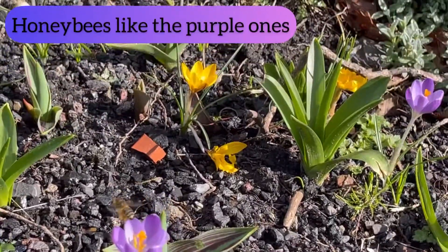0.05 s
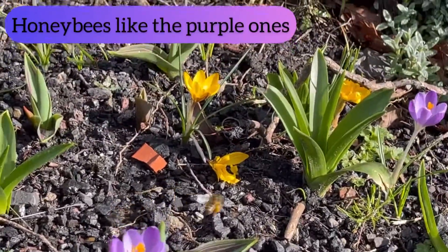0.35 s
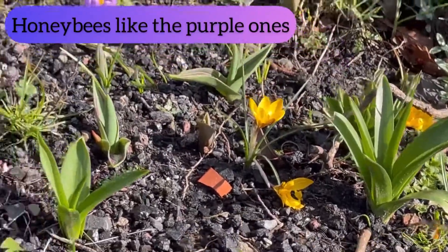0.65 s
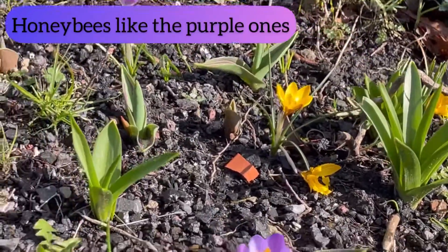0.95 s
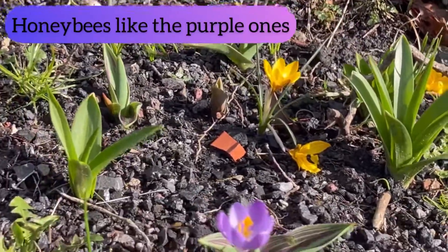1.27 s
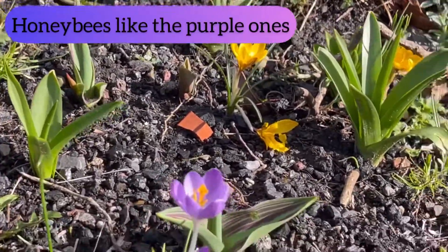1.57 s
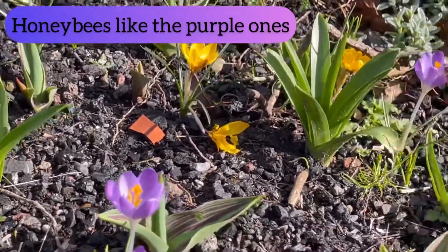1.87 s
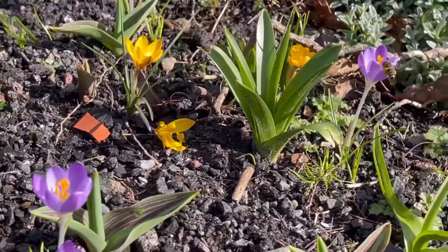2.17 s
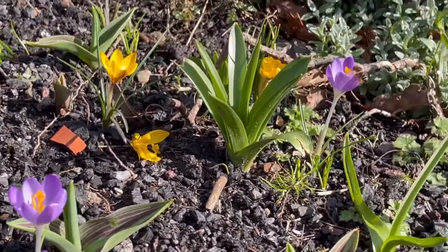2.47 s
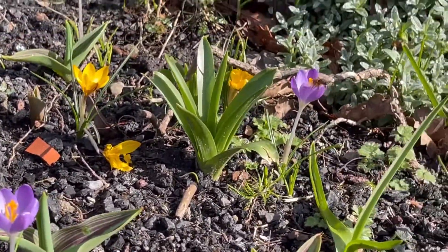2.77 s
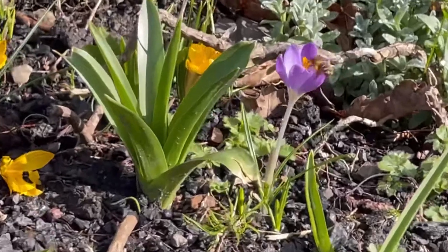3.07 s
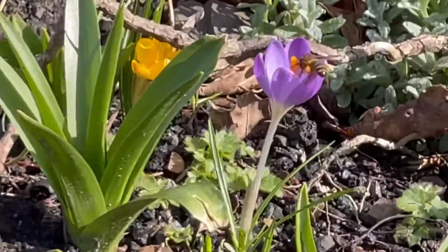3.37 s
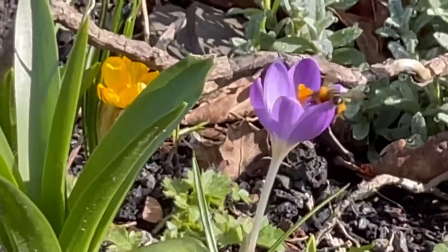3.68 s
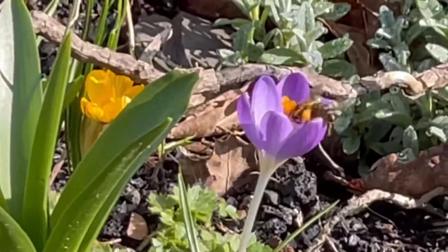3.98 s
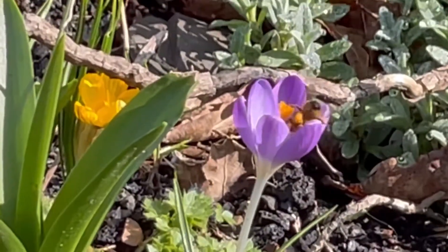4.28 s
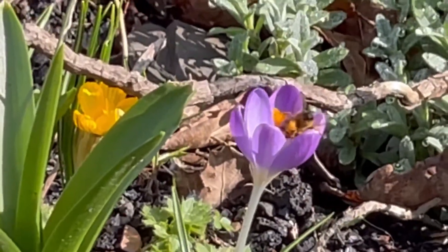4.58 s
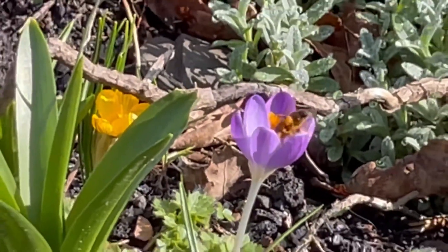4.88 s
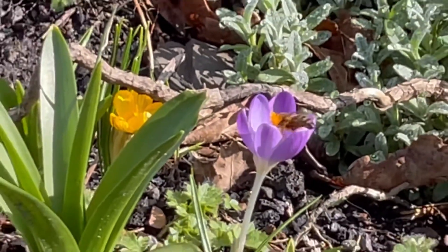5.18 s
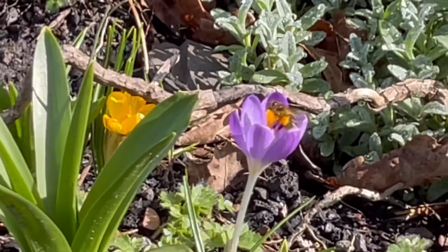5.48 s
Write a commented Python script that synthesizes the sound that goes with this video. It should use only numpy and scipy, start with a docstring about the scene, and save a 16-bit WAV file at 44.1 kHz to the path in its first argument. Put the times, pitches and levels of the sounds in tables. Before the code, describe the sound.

A hand scuffs and bumps the microphone, then high birdsong comes through a low outdoor rumble and a fading, far-off engine. One bird sings fast slurs and twitters, and another keeps up a faint see-saw call, both slightly blurred by the garden around them. Cloth rustles close by now and then, most crisply near the middle, where a few soft knocks follow. The singing grows sparser and softer later.

```python
"""Spring garden birdsong

A songbird warbles thin gliding notes while a farther bird repeats a see-saw call at an even pace,
both blurred by shrubs and walls. A distant engine hums and fades into the rumble of the town.
Close by, cloth rustles past the microphones and a hand scuffs and bumps the camera it holds."""
import sys
import numpy as np
from scipy import signal
from scipy.fft import rfft, irfft
from scipy.io import wavfile
from scipy.ndimage import uniform_filter1d

SR = 44100
rng = np.random.default_rng(int(sys.argv[2]) if len(sys.argv) > 2 else 0)


def wav_out(sig):
    """Save sig, one row per channel (or a flat mono array), as 16-bit PCM at SR to the path in sys.argv[1]."""
    wavfile.write(sys.argv[1], SR, np.round(np.clip(np.atleast_2d(sig).T, -1, 1) * 32767).astype(np.int16))


N = 248724
TIME = np.arange(N) / SR
HZ = np.fft.rfftfreq(N, 1 / SR)


def amp(db):
    """Decibels to gain."""
    return 10 ** (np.asarray(db) / 20)


def unit(x):
    """Scales to rms 1."""
    return x / np.sqrt(np.mean(x ** 2) + 1e-20)


def read(points, hz):
    """Reads a curve on a log-frequency axis."""
    f, value = np.transpose(points)
    return np.interp(np.log(hz + 1), np.log(f), value)


def curves(table):
    """Each column of a time table as a sample-by-sample envelope."""
    s, *columns = np.transpose(table)
    return [np.interp(TIME, s, column) for column in columns]


def add(mix, s, sound):
    """Mixes a sound in at time s."""
    part = mix[max(round(s * SR), 0):][:len(sound)]
    part += sound[:len(part)]


def wander(rate_hz):
    """Smooth random drift of rms 1."""
    return unit(irfft(rfft(rng.standard_normal(N)) * np.exp(-(HZ / rate_hz) ** 2), N))


def swell(middle_s, half_s):
    """A smooth rise and fall around one moment."""
    return np.exp(-((TIME - middle_s) / half_s) ** 2)


def garden(x, wet_db, t60, near_db, near_t60, spread):
    """Near shrubs blur a sound at once; farther walls add a thin tail of echoes."""
    t = TIME[:SR]
    taps = rng.standard_normal((2, SR)) * (rng.random((2, SR)) < 2000 / SR) * (t > .003)
    decay = amp(near_db) * unit(amp(-60 * t / near_t60)) + amp(wet_db) * unit(amp(-60 * t / t60))
    mid, side = signal.fftconvolve(x[None], unit(taps) * decay / np.sqrt(SR), axes=1)[:, :N]
    return x + np.array([mid + spread * side, mid - spread * side])


# Stereo image of the ambience. Each row: frequency in Hz, left-right correlation.
CORRELATION = [(50, 1), (150, 0.87), (300, 0.37), (600, 0.14), (1100, -0.24), (2000, 0.42), (4000, 1),
               (12000, 1)]

def wash(spectrum, band_hz):
    """Diffuse stereo noise whose mid signal has rms 1 inside the band."""
    mid, side = rfft(rng.standard_normal((2, N))) * amp(read(spectrum, HZ))
    same = np.clip(read(CORRELATION, HZ), -1, 1)
    side *= np.sqrt((1 - same) / (1 + same + 1e-3))
    inside = irfft(mid * (HZ > band_hz[0]) * (HZ < band_hz[1]), N)
    return irfft(np.array([mid + side, mid - side]), N) / inside.std()


# Tone of the three ambience beds. Each row: frequency in Hz, gain in dB.
RUMBLE_EQ = [(20, -37), (35, -24), (55, 4.5), (80, 7), (130, 1.5), (165, -4), (200, -1), (265, -0.5),
             (320, -11.5), (400, -17.5), (500, -12.5), (900, -38), (2000, -76)]
ROAD_EQ = [(200, -21), (500, -6), (800, -1), (1100, 6), (1400, 0), (1800, -8), (2400, -14.5), (3000, -38),
           (6000, -33.5), (12000, -34.5)]
AIR_EQ = [(300, -18), (700, 5), (1500, 0), (1800, -0.5), (2300, 3.5), (3000, -5), (4200, -10),
          (6000, -16.5), (9000, -20), (10500, -16), (11300, -18), (12500, -38)]
# Fader moves on the beds. Each row: time in seconds, rumble in dB, air in dB.
BED_FADERS = [(0, -49, -59.5), (.35, -49, -64), (1.0, -49, -63), (1.5, -52.5, -67.5), (2.6, -54, -73),
              (3.2, -56.5, -75.5), (3.8, -57.5, -78.5), (5.25, -59, -81.5), (5.5, -58.5, -76.5)]

def surroundings(road_db=-64.3, road_fall_db_per_s=0.3):
    """Town rumble, a far road and a thin hiss of air, all slowly easing."""
    rumble_db, air_db = curves(BED_FADERS)
    rumble = amp(rumble_db + 0.69 * wander(3)) * wash(RUMBLE_EQ, band_hz=(160, 400))
    road = amp(road_db - road_fall_db_per_s * TIME + 0.88 * wander(4)) * wash(ROAD_EQ, (850, 1600))
    air = amp(air_db + 0.68 * wander(13)) * wash(AIR_EQ, band_hz=(1900, 2800))
    return rumble * amp([[.5], [-.5]]) + (road + air) * amp([[-.8], [.8]])  # slightly left, right


# The drone's noise bands. Each row: multiple of the pitch, gain in dB.
DRONE_PARTIALS = [(1, 0.5), (1.2, -8.5)]

def drone(start_hz=302.8, rest_hz=227.3, settle_s=2.85, fall_db_per_s=2.5, width_hz=30, spread=0.51):
    """Two narrow bands of distant engine noise slide down and fade as their source moves away."""
    hz = rest_hz + (start_hz - rest_hz) * np.exp(-TIME / settle_s)
    angle = 2 * np.pi * np.cumsum(hz) / SR

    def band(multiple):
        noise = wander(width_hz) + 1j * wander(width_hz)
        return unit((noise * np.exp(1j * multiple * angle)).real)

    mid, side = (sum(amp(db) * band(k) for k, db in DRONE_PARTIALS) for _ in range(2))
    return amp(-49.5 - fall_db_per_s * TIME) * np.array([mid + spread * side, mid - spread * side])


# Swells of the engine's second harmonic. Each row: middle in seconds, half length in seconds, level in dB.
HUM_SWELLS = [(3.837, 0.17, -46.5), (4.36, 0.13, -50), (4.952, 0.056, -52)]

def engine_second_harmonic(pitch_hz=95.3):
    """A clean low tone at the engine's second harmonic that comes and goes on its own."""
    level = sum(amp(db) * swell(s, half_s) for s, half_s, db in HUM_SWELLS) * amp(wander(10))
    hz = pitch_hz * (1 + 0.017 * wander(9.1))
    return np.sqrt(2) * level * np.sin(2 * np.pi * np.cumsum(hz) / SR)


# The engine's course. Each row: time in seconds, pitch in Hz, relative level in dB.
ENGINE_COURSE = [(0, 48.3, -35.5), (.75, 47.7, -39.5), (1.05, 47.67, -34.5), (1.6, 47.57, -39),
                 (2.0, 47.6, -47.5), (2.4, 47.36, -58.5), (3.85, 45.74, -52.5), (4.7, 45.3, -52.5),
                 (5.64, 47.1, -73)]
# Its harmonics. Each row: multiple of the pitch, gain in dB.
ENGINE_HARMONICS = [(1, 1.5), (2, -13), (3, -20)]

def engine(throb_db=2.0, throb_hz=15):
    """A distant engine: a deep, unevenly throbbing hum with weak overtones."""
    hz, db = curves(ENGINE_COURSE)
    cycles = np.cumsum(hz * (1 + 0.019 * wander(15))) / SR
    hum = np.zeros(N)
    for multiple, gain_db in ENGINE_HARMONICS:
        throb = amp(gain_db + throb_db * wander(throb_hz))
        hum += throb * np.sin(2 * np.pi * (multiple * cycles + rng.random()))
    return amp(db + 0.5) * hum


# Grip scuffs. Each row: middle and half length in seconds, centre and width in Hz, level in dB.
GRIP_SCUFFS = [(.01, 0.027, 77.8, 22, -27), (0.097, 0.14, 122, 35, -41.5), (0.11, 0.094, 346, 69.6, -52.5),
               (4.299, 0.028, 139, 35, -55), (5.415, 0.078, 403, 149.6, -57.5),
               (5.43, 0.043, 5820, 450, -75)]

def scuffs():
    """The hand shifts its grip: short swells of soft noise."""
    out = np.zeros(N)
    for s, half_s, hz, width_hz, db in GRIP_SCUFFS:
        band = np.exp(-((HZ - hz) / width_hz) ** 2 / 2)
        out += amp(db) * swell(s, half_s) * unit(irfft(rfft(rng.standard_normal(N)) * band, N))
    return out


# Finger knocks. Each row: start in seconds, pitch in Hz, level in dB, attack in seconds.
KNOCKS = [(0.104, 62, -20, 0.017), (0.17, 69.4, -33, 0.009), (2.364, 70, -37.5, 0.013),
          (2.66, 720, -47.5, 0.0023), (2.674, 600, -36.5, 0.0039), (2.682, 97.4, -40, 0.011),
          (3.078, 55, -36.5, 0.02), (5.425, 101, -45, 0.0071)]

def bumps():
    """Soft knocks of the hand ring the camera body for a few cycles."""
    out, t = np.zeros(N), TIME[:SR // 4]
    for s, hz, db, attack_s in KNOCKS:
        envelope = (t / attack_s * np.exp(1 - t / attack_s)) ** 2
        add(out, s, amp(db) * envelope * np.sin(2 * np.pi * hz * t))
    return out


# Tone of the cloth, for rubs and snags. Each row: frequency in Hz, gain in dB.
CLOTH_EQ = [(800, -15), (2000, -9), (3300, -2), (4400, -0.5), (4800, -5), (6000, -5), (6900, 2),
            (7700, -4.5), (9100, -1.5), (10500, 2.5), (11300, -4), (12000, -26), (13000, -33)]
# Cloth rubs. Each row: start and end in seconds, relative level in dB, brightness, swell in dB.
RUBS = [(0.721, 1.03, -70, -4, -9), (1.034, 1.186, -67, 6, -12), (1.21, 1.585, -65, -6, -1.5),
        (2.281, 2.393, -61.5, 7, -2), (2.431, 2.535, -55, 9.5, 3), (2.903, 2.998, -62.5, 8, 4),
        (3.19, 3.331, -61, 13.5, 13), (4.466, 4.513, -79, -11, 0), (5.478, 5.519, -61.5, 11, -7)]

def rustles(snaps_per_s=70, snap_db=18.5, fold_db=4, fade_s=0.02, pivot_hz=8000):
    """Cloth slides with uneven drag: fibres slip in clumps or snap, each fold with its own colour."""
    hiss = rng.standard_normal(N)
    grain_db = 2.5 * np.minimum(rng.exponential(1, N), 4)
    clump_db, drag_db = 3.5 * wander(190), 3 * wander(23)
    slips = unit(hiss * amp(grain_db + clump_db + drag_db))
    snaps = rng.standard_normal(N) * (rng.random(N) < snaps_per_s / SR)
    frames = signal.stft(slips + amp(snap_db) * snaps, nperseg=256)[2]
    folds = uniform_filter1d(rng.standard_normal(frames.shape), size=3, axis=0)
    folds = unit(uniform_filter1d(folds, size=8, axis=1))  # patches in frequency and time
    spectrum = rfft(signal.istft(frames * amp(fold_db * folds))[1][:N]) * amp(read(CLOTH_EQ, HZ))
    octaves = np.clip(np.log2((HZ + 1) / pivot_hz), -.6, .6)
    rub = np.zeros(N)
    for start, end, db, brightness, swell_db in RUBS:
        stroke = np.clip(np.minimum(TIME - start, end - TIME) / fade_s + .5, 0, 1)
        pressure = amp(db + swell_db * np.interp(TIME, [start, end], [-.5, .5]))
        fibres = irfft(spectrum * amp(0.67 * brightness * octaves), N)
        rub += pressure * stroke * fibres / fibres[stroke > 0].std()
    return amp(2.5) * garden(rub, wet_db=-18, t60=0.27, near_db=-8.5, near_t60=0.17, spread=0.14)


# Cloth snags. Each row: peak time in seconds, relative level in dB, centre in Hz, attack in seconds.
SNAGS = [(0.731, -54, 9600, .0025), (1.319, -54.5, 7000, 0.0073), (1.569, -58, 7000, .0029),
         (2.287, -48, 8200, 0.0065), (2.305, -46, 7460, 0.0046), (2.356, -50.5, 8500, .003),
         (2.43, -43, 9170, 0.0021), (2.445, -40, 9650, 0.0021), (2.502, -47.5, 8000, 0.0068),
         (3.308, -50, 8850, 0.0047)]

def snags(width_hz=2600):
    """Now and then the cloth snags and lets go with a short crisp burst."""
    out, t = np.zeros(N), TIME[:4096]
    hz = np.fft.rfftfreq(len(t), 1 / SR)
    for s, db, centre_hz, attack_s in SNAGS:
        colour = amp(read(CLOTH_EQ, hz)) * np.exp(-((hz - centre_hz) / width_hz) ** 2 / 2)
        burst = unit(irfft(rfft(rng.standard_normal(len(t))) * colour))
        envelope = (t / attack_s * np.exp(1 - t / attack_s)) ** 2
        add(out, s - attack_s, amp(db) * envelope * burst)
    return amp(-0.5) * out


def whistle(length_s, pitches_hz, levels_db, waver, flutter_db, edge_s):
    """One bird note: a sine on a smooth glide that trembles in pitch and strength."""
    along = np.linspace(0, 1, max(int(length_s * SR), 64))
    contour = np.polyfit(np.linspace(0, 1, len(pitches_hz)), pitches_hz, len(pitches_hz) - 1)
    tremble, flutter = (unit(uniform_filter1d(rng.standard_normal(SR // 4), size=n))[:len(along)]
                        for n in (120, 300))
    hz = np.polyval(contour, along) * (1 + waver * tremble)
    db = np.interp(along, (np.arange(len(levels_db)) + .5) / len(levels_db), levels_db)
    gate = signal.windows.tukey(len(along), min(2 * edge_s / length_s, 1))
    return np.sqrt(2) * amp(db + flutter_db * flutter) * gate * np.sin(2 * np.pi * np.cumsum(hz) / SR)


def far_birds(count=90, low_hz=3300, high_hz=5000):
    """Faint falling slurs from other gardens, more echo than note."""
    voice = np.zeros(N)
    for k, (late, pitch, slope, length, soft) in enumerate(rng.random((count, 5))):
        fall = 1 + (slope + .35) * np.array([.13, -.02, -.1])
        pitches_hz = (low_hz + (high_hz - low_hz) * pitch) * fall
        note = whistle(.033 + .04 * length, pitches_hz, [-5 * soft],
                       waver=.014, flutter_db=3, edge_s=.007)
        add(voice, (k + late) / count * N / SR, note)
    return amp(-90.5) * garden(voice, wet_db=4.5, t60=0.52, near_db=6, near_t60=0.12, spread=0.27)


# Glides of the two see-saw notes. Each entry: pitch in Hz, evenly spaced along the note.
LOW_GLIDE = [3800, 4140, 4200, 4204]
HIGH_GLIDE = [6350, 6260, 6410, 6360]
# Their balance. Each row: time in seconds, relative levels of the low and the high note in dB.
CALL_FADERS = [(.5, -68, -69), (1.24, -64, -67), (1.6, -59.5, -76), (2.3, -64, -80), (3.39, -61, -94),
               (3.67, -68.5, -87), (4.15, -63.5, -72), (4.55, -64.5, -81), (5.3, -66, -81)]
# Runs of calls. Each row: start, end and repeat period, all in seconds.
CALL_RUNS = [(.48, .6, .267), (1.235, 2.7, .267), (2.83, 4.36, .279), (4.504, 5.45, .267)]

def seesaw_bird(high_after_s=.125):
    """A husky upslur that settles, then a faint high note, evenly repeated and blurred by distance."""
    voice = np.zeros(N)
    low_db, high_db = curves(CALL_FADERS)
    for s in np.concatenate([np.arange(*run) for run in CALL_RUNS]):
        now = round(s * SR)
        rising_db = low_db[now] + np.array([-6, -1, 0])
        low = whistle(.0792, LOW_GLIDE, rising_db, waver=.022, flutter_db=2.5, edge_s=.0053)
        high = whistle(.043, HIGH_GLIDE, [high_db[now]], waver=.0067, flutter_db=3, edge_s=.0069)
        add(voice, s, low)
        add(voice, s + high_after_s, high)
    return amp(-3.5) * garden(voice, wet_db=-7, t60=0.83, near_db=-4, near_t60=0.095, spread=.2)


# Bouts of soft twittering. Each row: start in seconds, end in seconds, level in dB.
TWITTER_BOUTS = [(1.73, 1.86, -67), (3.04, 3.27, -71), (3.385, 3.451, -66)]

def twitter(flicks_per_s=60, flick_s=.018, centre_hz=4420, scatter_hz=800, fall_hz=600):
    """The songbird fills its quickest phrases with tiny falling flicks at random pitches."""
    voice = np.zeros(N)
    for start, end, db in TWITTER_BOUTS:
        jitter = rng.uniform(-1, 1, (64, 2))
        for s, (late, pitch) in zip(np.arange(start, end, 1 / flicks_per_s), jitter):
            pitches_hz = centre_hz + scatter_hz * pitch + fall_hz * np.array([.5, -.5])
            flick = whistle(flick_s, pitches_hz, [db], waver=.014, flutter_db=2, edge_s=.0056)
            add(voice, s + .5 * late / flicks_per_s, flick)
    return garden(voice, wet_db=-10, t60=.5, near_db=-4.5, near_t60=0.072, spread=.3)


# The lead song. Each row: start and length in seconds, first pitch, last pitch and arch of the
# glide in Hz, relative level in dB, swell in dB per note length.
SONG_NOTES = [(0.421, 0.065, 5300, 4700, -180, -62.5, -10), (0.594, .041, 4810, 6030, -470, -61, 12),
              (0.657, 0.04, 5930, 4800, -100, -58.5, 7), (0.763, 0.058, 7200, 5800, -250, -60.5, 20),
              (1.062, 0.07, 5160, 3390, 300, -57.5, 1), (1.167, .064, 3270, 4020, 130, -64.5, 3),
              (1.424, 0.079, 4430, 4390, 322, -63, 5), (1.547, 0.12, 5400, 5120, 184, -59.5, -3),
              (1.695, 0.076, 3840, 4600, -240, -65.5, 13), (1.736, .028, 4430, 4200, 596, -58.5, 0),
              (1.773, 0.044, 4640, 4350, 455, -61.5, 4), (1.819, 0.05, 5000, 3130, -650, -61, -18),
              (1.921, .049, 3410, 2540, -100, -65.5, -2), (1.941, 0.037, 5980, 4700, -370, -56.5, 0),
              (1.978, 0.033, 4040, 5080, 82, -58, -2), (2.048, 0.026, 6880, 6400, -320, -58.5, -2),
              (2.088, 0.037, 8350, 6240, -190, -59.5, 20), (2.148, 0.043, 5330, 6310, 324, -57, 12),
              (2.234, 0.036, 5830, 4830, 190, -54.5, -1), (2.275, 0.021, 5980, 5940, 490, -51.5, 13),
              (2.455, 0.092, 3280, 3230, 1203, -57.5, -3), (2.628, 0.078, 5600, 5470, 134, -51, 8.5),
              (2.727, 0.051, 5460, 5160, -59, -54, -5), (2.914, 0.0265, 5070, 5730, 200, -51, 6),
              (2.939, .056, 5640, 4100, -58, -57.5, -15), (3.166, 0.027, 5200, 4500, -100, -62.5, 0),
              (3.197, 0.018, 3870, 3920, 40, -61.5, -2), (3.226, 0.031, 4830, 4270, 500, -61, 8),
              (3.255, 0.037, 3600, 4020, 60, -64, 0), (3.383, .05, 5360, 4240, 301, -66, 7),
              (3.421, 0.055, 4520, 3120, -310, -66, -9), (3.514, 0.074, 5480, 4700, -100, -77, -4),
              (3.958, 0.067, 5640, 4670, -210, -75, 8), (4.818, 0.056, 8310, 7860, -120, -69, 4),
              (4.849, 0.093, 7660, 7430, 169, -67.5, 3), (4.977, 0.068, 8050, 7480, 139, -69.5, 13),
              (5.015, 0.016, 4710, 5000, 147, -65, -10), (5.083, 0.067, 8030, 7020, 740, -74, 7),
              (5.156, .086, 8370, 7950, -170, -73.5, -5), (5.25, .085, 6900, 6420, 98, -80, 3)]

def songbird(full_voice_db=-60.5, max_waver_hz=50):
    """A quick warble of slurs, hooks and held notes: arched glides, huskier and more blurred if soft."""
    direct, blurred = np.zeros((2, N))
    for start, length, first_hz, last_hz, arch_hz, db, swell_slope in SONG_NOTES:
        pitches_hz = [first_hz, (first_hz + last_hz) / 2 + arch_hz, last_hz]
        levels_db = db + swell_slope * np.array([-1, 0, 1]) / 3
        softness_db = max(full_voice_db - db, 0)
        waver = min(.0045 + 0.8 * softness_db, max_waver_hz / first_hz)
        note = whistle(length + .00575, pitches_hz, levels_db, waver, flutter_db=3, edge_s=.0061)
        hidden = min(.025 * softness_db, .5)  # share of the power that arrives only through the shrubs
        add(direct, start - .003, np.sqrt(1 - hidden) * note)
        add(blurred, start - .003, np.sqrt(hidden) * note)
    shrubs = garden(blurred, wet_db=-8, t60=.45, near_db=-0.5, near_t60=0.047, spread=0.42) - blurred
    clear = garden(direct, wet_db=-8.5, t60=0.65, near_db=-6.5, near_t60=0.077, spread=0.28)
    return amp(-1.3) * (clear + shrubs)


def scene():
    """The birds over the town, with the handling sounds close by."""
    birds = songbird() + seesaw_bird() + far_birds()
    handling = rustles() + snags() + scuffs() + bumps()
    town = engine() + engine_second_harmonic() + drone() + surroundings()
    return town + handling + birds + twitter()


# Phase between the microphone ports. Each row: frequency in Hz, lead of the left side in radians.
LEFT_LEAD = [(50, 0), (1800, 0), (2700, 0.48), (5200, .5), (6800, -0.66), (8800, 0.5), (9400, -1.86),
             (10250, -3.5), (10900, -4.5), (11450, -5)]

def record(dry, cutoff_hz=12500):
    """The two microphone ports shift the phase apart; a steep low-pass trims the top."""
    phase = read(LEFT_LEAD, np.fft.rfftfreq(2 * N, 1 / SR))
    ports = irfft(rfft(dry, 2 * N) * np.exp(.5j * np.array([[1], [-1]]) * phase))[:, :N]
    lowpass = signal.firwin(255, cutoff_hz, window=("kaiser", 9), fs=SR)
    return signal.oaconvolve(ports, lowpass[None], "same")


dry = scene()
out = record(dry)
wav_out(out)
```